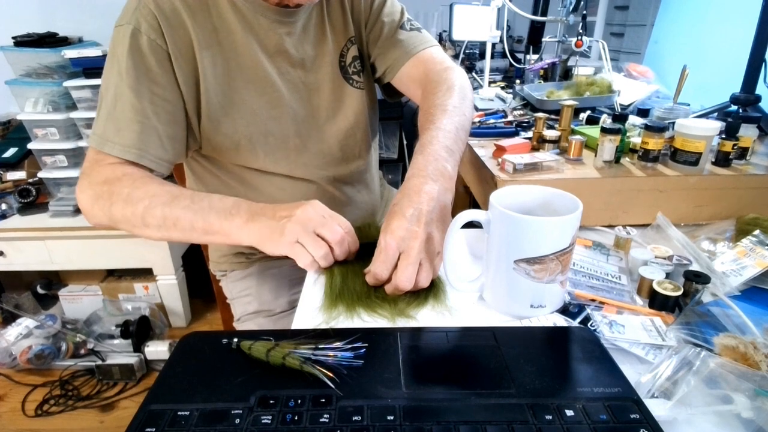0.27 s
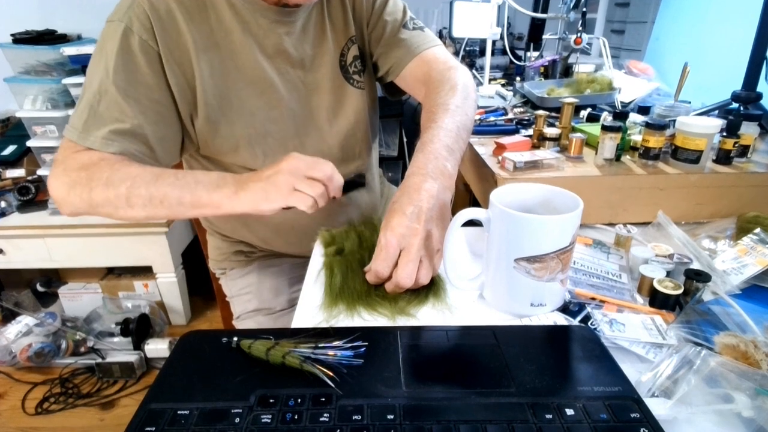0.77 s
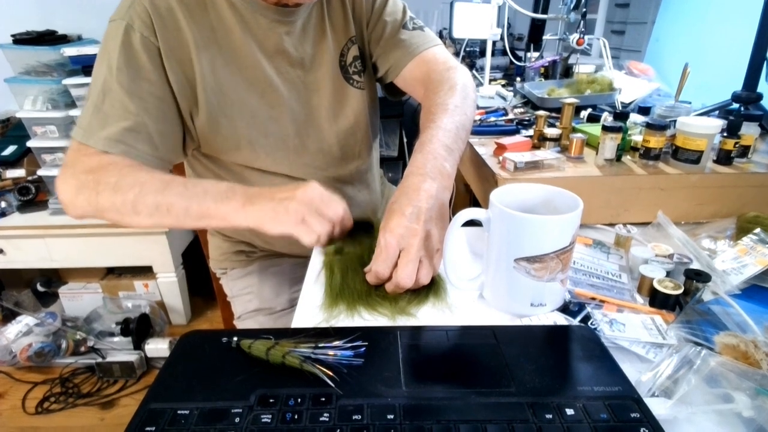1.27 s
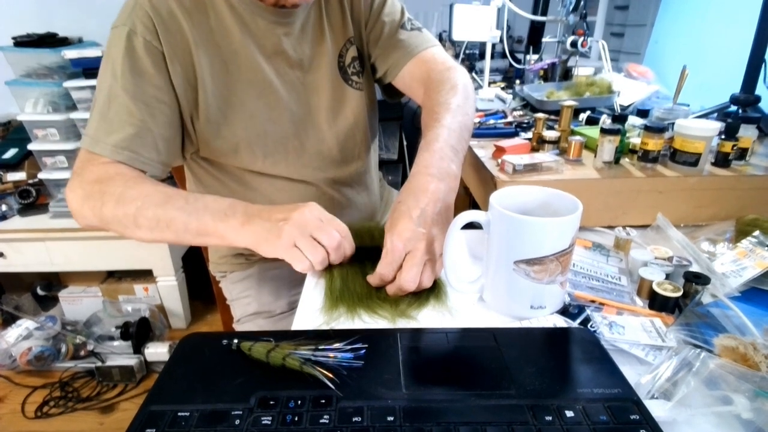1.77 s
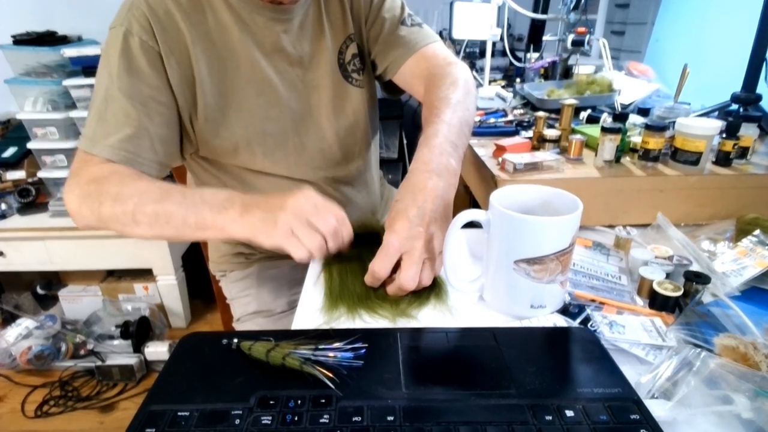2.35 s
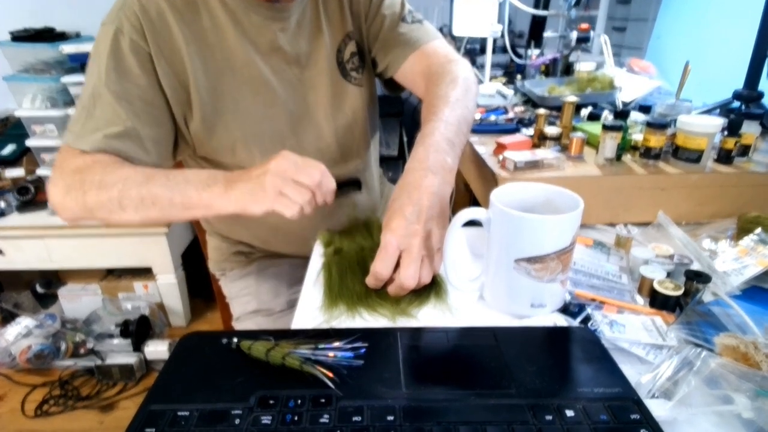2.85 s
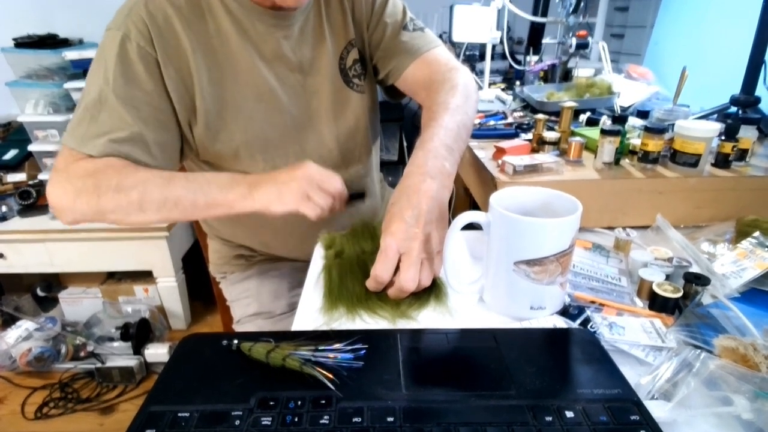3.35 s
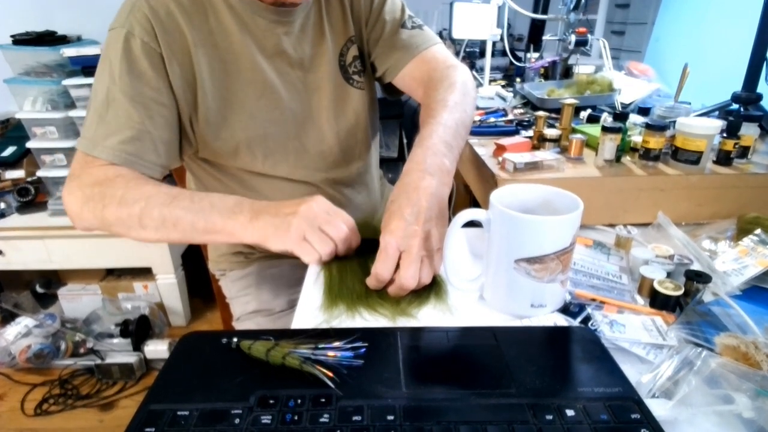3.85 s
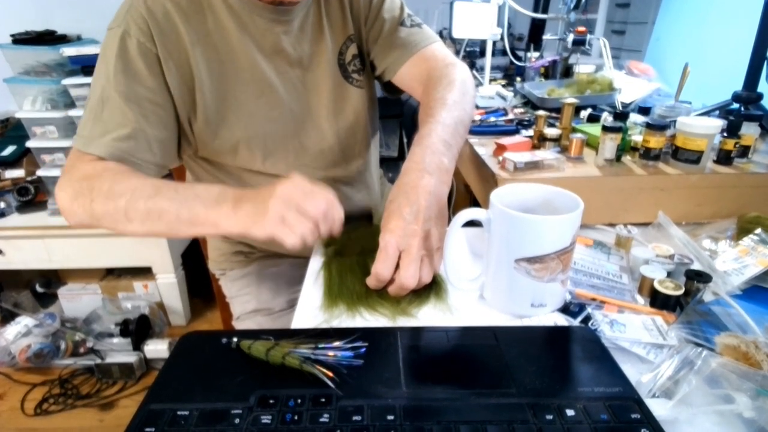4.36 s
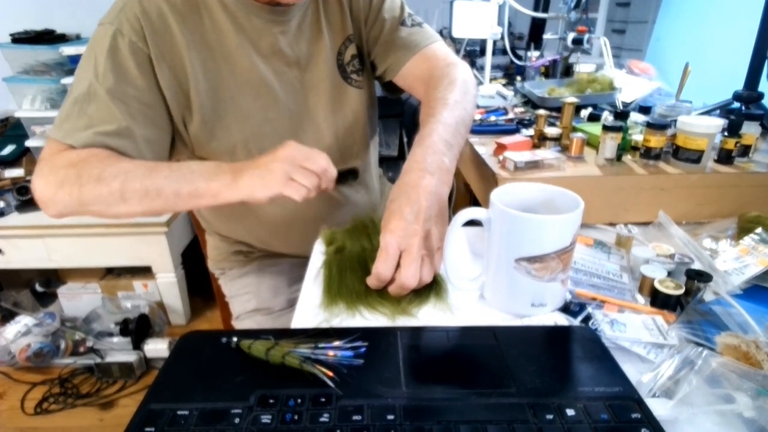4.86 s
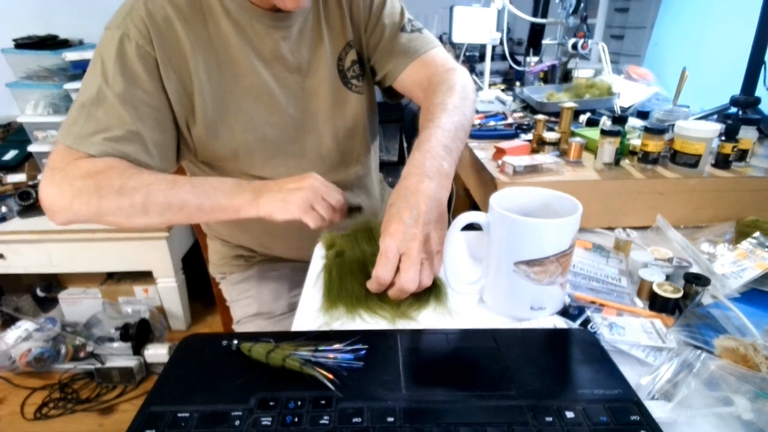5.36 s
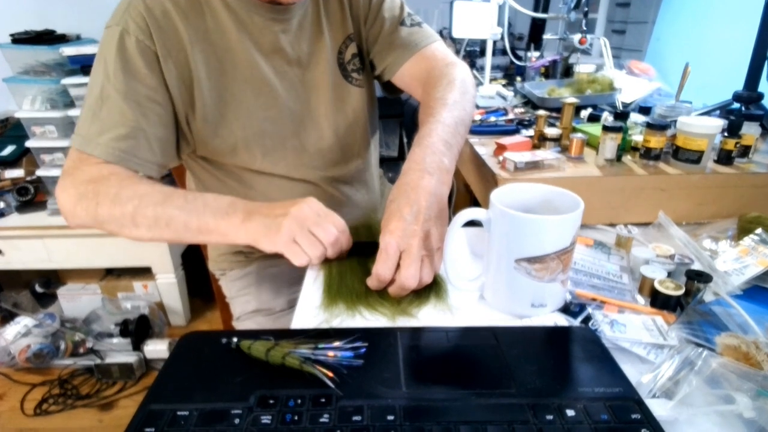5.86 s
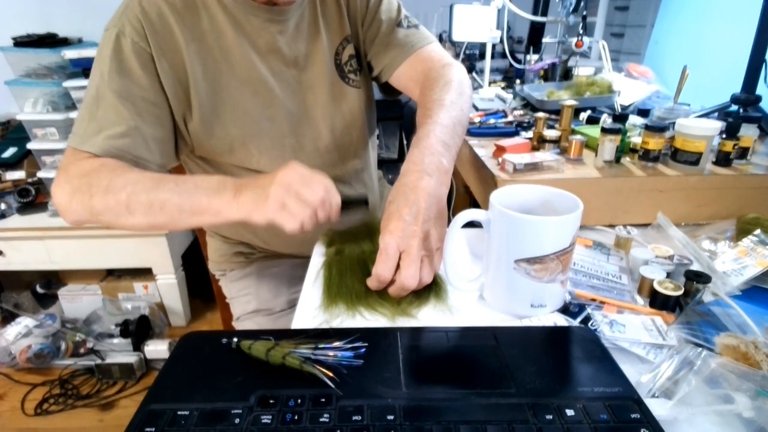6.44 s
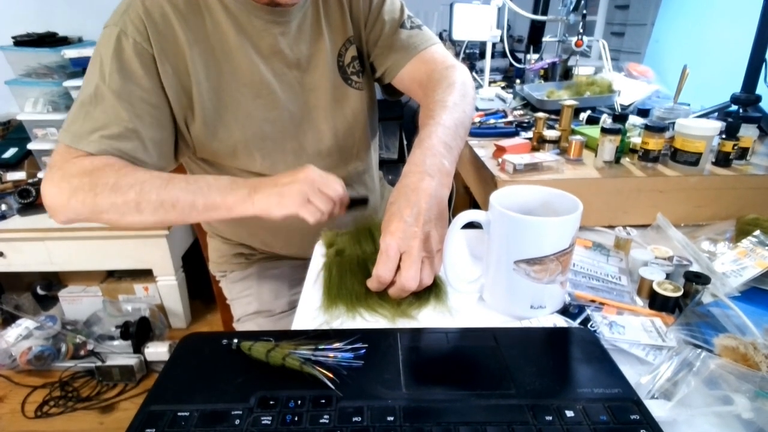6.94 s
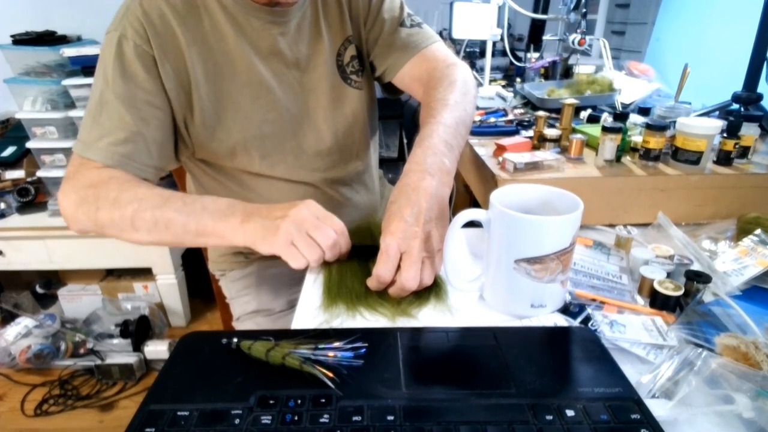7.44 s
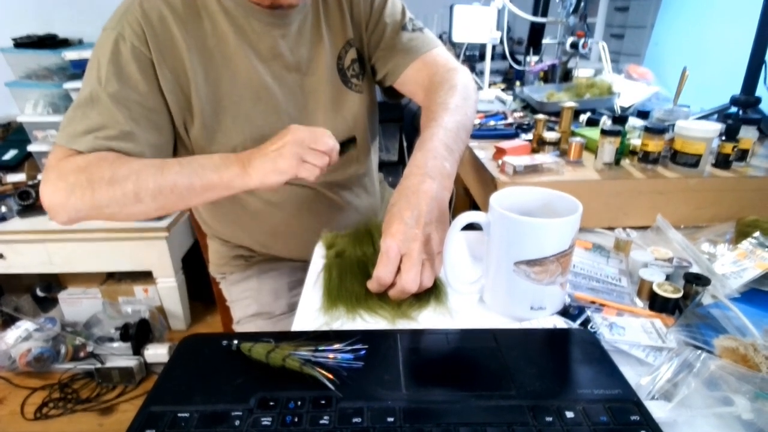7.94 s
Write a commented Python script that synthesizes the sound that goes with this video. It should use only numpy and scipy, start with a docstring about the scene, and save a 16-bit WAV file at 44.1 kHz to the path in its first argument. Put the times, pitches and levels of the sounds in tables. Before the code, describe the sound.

A small stiff brush is dragged through craft fur on a thin board in short, grainy strokes, roughly two every three seconds. Each swells, then lifts away with a brighter rasp, over a dull woody rub. Light taps and tiny clicks fall between, with one dry snap early on. Around the middle and later, three hard clattering raps hit the board. Close stereo microphone, small cluttered room, steady soft hiss.

```python
"""In a small cluttered room, a small stiff brush is dragged in short strokes through craft fur on a thin
board lying on a desk, close to a pair of microphone ports. Fibres slip off the teeth as fine random grains,
the board and desk drone under the pressure as filtered noise, and three times the teeth strike the board.
Lighter taps, ringing clicks and one dry snap lie between; room tails, hiss and a thin tone lie behind."""
import sys
import numpy as np
from scipy import signal
from scipy.fft import rfft, irfft
from scipy.io import wavfile
from scipy.ndimage import uniform_filter1d

SR = 44100
rng = np.random.default_rng(int(sys.argv[2]) if len(sys.argv) > 2 else 0)


def bounce(signal):
    """Save signal as a 16-bit WAV file at the path given by the first command-line argument."""
    frames = np.transpose(np.atleast_2d(signal))
    limited = np.clip(frames, -1, 1)
    pcm = np.round(limited * 32767).astype(np.int16)
    wavfile.write(sys.argv[1], SR, pcm)


N = 361708

# Microphone hiss and room air. Each row: frequency in Hz, density in dB per Hz before levelling.
HISS_COLOUR = [(12, -31.5), (20, -8.5), (107, -2.5), (137, -6), (260, -4.5), (407, -6), (508, -6.5),
               (653, -5), (840, -7), (1470, -8.5), (15700, -17)]
# Likeness of the hiss at the two ports. Each row: frequency in Hz, likeness from -1 to 1.
HISS_LIKENESS = [(60, 0.44), (180, 0.13), (550, 0.07), (1650, 0.088), (4970, -0.026), (15000, -0.071)]
HISS_LEFT_DB, HISS_RIGHT_DB = -60.5, -59.9
# Faint steady tone. Each row: frequency in Hz, level in dB rms.
WHINE_TONES = [(7391, -93)]
# Dying time of the room. Each row: frequency in Hz, time to fall by 60 dB in seconds.
ROOM_T60 = [(150, 0.68), (400, 0.16), (1040, 0.42), (2760, 0.36), (7280, 0.26)]
# Loudness of the room tail. Each row: frequency in Hz, level relative to the direct sound in dB.
ROOM_LEVEL = [(150, -14.5), (500, -9), (1500, -7), (3000, -0.5), (8000, 2.5)]
# Likeness of the room tail at the two ports. Each row: frequency in Hz, likeness from 0 to 1.
ROOM_LIKENESS = [(60, 1), (130, 0.46), (290, 0.92), (640, 0.94), (1410, 0.52), (3100, 0.25), (6820, 0.051),
                 (15000, 0.04)]
# Balance of the port pair. Each row: frequency in Hz, left minus right in dB.
PORT_TILT = [(60, -2.5), (240, -1.0), (950, -0.5), (3770, -1.5), (15000, 1.5)]
# Width of the brushing at the ports. Each row: frequency in Hz, side relative to mid in dB.
SWISH_WIDTH = [(60, -4), (130, -2), (290, -18.5), (640, -16.5), (1410, -11), (3100, -5), (6820, -2),
               (15000, 1)]
# Width of the hard strikes at the ports. Each row: frequency in Hz, side relative to mid in dB.
STRIKE_WIDTH = [(60, -4.5), (120, -19), (240, -14), (480, -22), (950, -11), (1890, -6), (3770, 0.5),
                (7520, -10), (15000, -1)]

# Resonances of board and brush. Each row: frequency in Hz, width in Hz, lift (or cut, if negative) in dB.
RESONANCES = [(279, 22, 5.5), (335.6, 36, 10.5), (475, 85, 3), (513, 69, 6), (732, 120, 13), (874, 61, 7),
              (1330, 26, 4), (1594, 120, 4), (1980, 140, 3), (2720, 72, 0), (2840, 27, -8),
              (3161, 40, -11.5), (3187, 175, 8), (3233, 127, -3), (3350, 180, -1), (5730, 230, -2.5)]
# Colours before the resonances and levelling. Each row: frequency in Hz, density in dB per Hz.
FIBRE_COLOUR = [(530, -33), (900, -8), (1290, -6), (1700, -4.5), (2250, -6.5), (2800, -1.5), (3350, -0.5),
                (3800, -25.5), (4600, -27), (7000, -52.5)]
RASP_COLOUR = [(2500, -52), (3500, 5), (4000, -0.5), (4800, -9), (5600, -16), (8300, -26.5), (15500, -20.5)]  # treble of fast fibres
TEETH_COLOUR = [(530, -35.5), (900, -4.5), (1350, -6.5), (1900, -3), (2350, -3.5), (2650, 4.5), (3400, 2),
                (3750, -9), (4400, -15), (5300, -23.5), (5900, -21), (6300, -31), (9000, -34.5),
                (15500, -54)]
STRUCK_BOARD_COLOUR = [(88, -44), (150, -13.5), (276, -6), (512, -2), (670, -12), (840, -21.5), (982, -27),
                       (1200, -20), (1560, -61), (2640, -120)]
PRESSED_BOARD_COLOUR = [(88, -34.5), (150, -3), (257, 0), (394, -0.5), (560, -5), (700, -13.5), (1000, -25),
                        (1200, -14), (1560, -47.5)]  # board under steady pressure
DESK_COLOUR = [(8, -26), (22, 1.5), (50, 6.5), (80, -5.5), (150, 1.5), (200, -10), (300, -36)]
SNAP_SPECTRUM = [(120, -28), (200, -30), (2090, -9), (2470, -15), (3070, 3.5), (4500, -9), (5300, -5),
                 (7090, -10), (7760, -9), (8820, -25), (12000, -16), (15500, -37)]

# Small pitched clicks among the clutter. Each row: start in seconds, level of the lower tone in dB, its pitch in Hz.
CLUTTER_CLICKS = [(0.477, -48, 1460), (0.495, -51, 1500), (.616, -57.5, 856), (.691, -58.5, 746),
                  (.984, -43, 657), (1.003, -44, 720), (1.191, -47.5, 1399), (1.207, -48.5, 3246),
                  (1.207, -43, 1480), (1.359, -53.5, 886), (2.694, -57.5, 870), (4.988, -50, 3110),
                  (6.347, -56.5, 215), (7.588, -55, 3240), (7.77, -52, 2930), (7.783, -52, 2960)]
CLICK_T60_S, CLICK_T60_SLOPE = 0.059, -0.43  # ring time at 1 kHz; higher clicks die sooner
# Dry, bright snap. Each row: start in seconds, peak of its drive in dB, length to 1/e in seconds.
SNAPS = [(1.3446, -29.5, 0.0026)]
# Light touches of the teeth on the board. Each row: start in seconds, nominal peak in dB, board relative to teeth in dB.
LIGHT_TAPS = [(0.113, -52, -17), (0.882, -51.5, -1.5), (0.9844, -55, 4), (1.0803, -33.5, -14),
              (1.333, -43, -28), (1.67, -50, -7), (1.771, -40, -11), (1.828, -40.5, -2), (2.387, -51, 8),
              (2.42, -45, -24), (2.768, -59, -11), (2.967, -48.5, -18), (3.395, -59.5, 0),
              (3.6424, -55.5, 3), (3.821, -41, -12), (4.11, -60.5, 3), (4.335, -47, 5), (4.985, -43.5, -3),
              (5.652, -49, 13.5), (5.741, -49, 1), (6.47, -53, -20), (6.647, -54, -10), (7.268, -50.5, -9),
              (8.186, -47, -15)]
TAP_RATTLE_S, TAP_DESK_DB = 0.014, -33  # desk relative to teeth
# Three hard strikes. Each row: start in seconds, nominal peak in dB, board relative to teeth in dB,
# rattle to 1/e in seconds, pitch factor of the struck spot, lift of the colour points above 5 kHz in dB.
HARD_STRIKES = [(4.5027, -19.5, -5.5, 0.031, 1.064, -0.5), (5.13, -20, -1, 0.033, 0.99, 2.5),
                (5.9037, -15, -5, 0.028, .99, 5.5)]
STRIKE_DESK_DB = -22  # relative to teeth
# Brush strokes. Each row: touch in seconds, then lengths of entry, pull and lift-off in seconds,
# fibres after entry in dB, fibres at the end of the pull in dB, desk relative to fibres in dB.
BRUSH_STROKES = [(0.098, 0.089, 0.038, 0.11, -57, -57, -11), (0.268, .065, 0.051, 0.13, -52, -52, -10),
                 (0.862, .1, 0.12, 0.083, -58.5, -46.5, -9), (1.558, 0.12, 0.12, 0.081, -58, -47.5, -10),
                 (2.268, 0.067, 0.099, 0.083, -53, -53, -11), (2.918, .04, .11, 0.075, -57.5, -51, -9),
                 (3.635, 0.027, 0.014, 0.056, -54, -53.5, -15),
                 (3.69, 0.039, 0.077, 0.043, -52.5, -43.5, -12),
                 (4.318, 0.045, 0.141, .035, -54.5, -46.5, -12),
                 (4.928, 0.05, 0.18, 0.041, -57, -48.5, -10),
                 (5.688, 0.062, 0.17, 0.047, -53.5, -47.5, -11), (6.535, 0.041, 0.11, 0.067, -53, -50, -11),
                 (7.308, 0.089, 0.072, 0.072, -51.5, -49, -13)]
TOUCH_DB = -18.5  # fibres at touch, relative to the end of the entry
LIFT_DB, LIFT_BEND = -33, 2.14  # fibres at the end, relative to the top; the fall starts slowly
RASP_DB, RASP_RISE_DB = -15, 11  # rasp relative to fibres at touch, and its rise over the stroke
# The hand leans on the brush. Each row: start in seconds, length to the middle of the fall in seconds, board in dB.
HAND_PRESSES = [(0.196, 0.035, -59.5), (0.283, 0.084, -55.5), (0.343, 0.07, -55), (0.961, 0.054, -48),
                (1.044, 0.086, -49.5), (1.655, 0.04, -61), (1.807, 0.045, -47), (2.37, 0.059, -51.5),
                (2.95, .04, -65), (3.079, 0.048, -56.5), (3.639, 0.043, -52), (3.774, 0.065, -44),
                (4.329, 0.087, -46.5), (4.416, 0.05, -56), (5.097, 0.067, -48), (5.744, 0.072, -47),
                (5.848, 0.11, -48), (6.61, 0.093, -51.5), (7.263, 0.028, -51), (7.374, 0.13, -49.5),
                (8.191, .03, -47.5)]
PRESS_RISE_S, PRESS_FALL_S = 0.009, 0.034
BOARD_DB, PRESS_DESK_DB = -8, -14.5  # board relative to fibres; desk relative to a press
EDGE_HZ = 15750


def amp(db):
    """Decibels to gain."""
    return 10 ** (np.asarray(db) / 20)


def evened(x):
    """Scales to rms 1."""
    return x / np.sqrt(np.mean(x ** 2) + 1e-20)


def read(points, hz):
    """Reads a table along log frequency."""
    f, value = np.transpose(points)
    return np.interp(np.log(hz + 1), np.log(f + 1), value)


def coloured(drive, spectrum, size=16384):
    """Passes a drive through the causal response with this spectrum and the resonances of board and brush."""
    hz = abs(np.fft.fftfreq(size, 1 / SR))
    db = read(spectrum, hz)
    for centre_hz, width_hz, lift_db in RESONANCES:
        db = db + lift_db / (1 + (2 * (hz - centre_hz) / width_hz) ** 2)
    log_gain = np.log(np.maximum(amp(db), 1e-5))
    phase = -signal.hilbert(log_gain).imag  # minimum phase: the response starts at once
    response = np.fft.ifft(np.exp(log_gain + 1j * phase)).real[:size // 2]
    return signal.oaconvolve(drive, response / np.linalg.norm(response))[:N]


def pair(frames, bins, same):
    """Random short-time spectra for two ports that are alike by the share same."""
    a, b, c, d = rng.standard_normal((frames, bins, 4)).T
    same = np.clip(same, -1, 1)[:, None]
    left, other = a + 1j * b, c + 1j * d
    return np.array([left, same * left + np.sqrt(1 - same ** 2) * other])


def grains(per_s, spread_db):
    """Clicks of random sign at random moments; a few are large."""
    present = rng.random(N) < per_s / SR
    size = np.minimum(rng.exponential(1, N), 5)
    return evened(present * random_signs() * amp(spread_db * size))


def random_signs():
    """White noise that only flips between -1 and 1."""
    return rng.choice([-1., 1.], N)


def lumps(size, depth_db):
    """A random gain of rms 1 that wanders over about size samples."""
    wander = uniform_filter1d(uniform_filter1d(rng.standard_normal(N), size), size)
    return evened(amp(depth_db * evened(wander)))


def hiss():
    """Microphone hiss and room air: shaped noise with faint patches drifting in time and frequency."""
    frames, hz = N // 256 + 5, np.fft.rfftfreq(1024, 1 / SR)
    patches = rng.standard_normal((frames, len(hz))).T
    patches = evened(uniform_filter1d(uniform_filter1d(patches, 14, 0), 12, 1))
    spectra = pair(frames, len(hz), read(HISS_LIKENESS, hz))
    spectra = spectra * amp(read(HISS_COLOUR, hz)[:, None] + 0.55 * patches)
    noise = signal.istft(spectra, nperseg=1024, noverlap=768)[1][:, :N]
    return amp([[HISS_LEFT_DB], [HISS_RIGHT_DB]]) * evened(noise)


def whine():
    """A thin steady sine behind the hiss, equal at both ports."""
    t = np.arange(N) / SR
    return sum(amp(db) * np.sqrt(2) * np.sin(2 * np.pi * hz * t) for hz, db in WHINE_TONES)


def room(x, count=4):
    """Noise tails dying band by band; several random tails fade into one another in a steady cycle."""
    hz, t, out = np.fft.rfftfreq(256, 1 / SR), np.arange(420) * 64 / SR, np.zeros((2, N))
    t60 = read(ROOM_T60, hz)[:, None]
    decay = amp(read(ROOM_LEVEL, hz)[:, None] - 60 * t / t60)
    decay /= np.sqrt(t60 * SR / np.log(1e6))  # the table alone sets the energy of the tail
    tilt = amp(read(PORT_TILT, hz)[:, None] * np.array([[[.5]], [[-.5]]]))
    for k in range(count):
        spectra = pair(len(t), len(hz), read(ROOM_LIKENESS, hz))
        gauge = np.std(signal.istft(spectra, nperseg=256, noverlap=192)[1])
        tail = signal.istft(spectra * decay * tilt, nperseg=256, noverlap=192)[1] / gauge
        tail *= np.minimum(np.arange(tail.shape[1]) / SR / 0.0034, 1)  # reflections need a moment to arrive
        share = np.sqrt(2 / count) * np.cos(np.pi * (4.3 * np.arange(N) / SR + k / count))
        out += signal.oaconvolve((x * share)[None], tail, axes=1)[:, :N]
    return out


def ports(ends, side):
    """The spaced ports share a mid; the side, set by frequency, is added at the left and taken off at the right."""
    hz = np.fft.rfftfreq(N, 1 / SR)
    mid, apart = rfft(ends)
    apart = apart * amp(read(side, hz))
    step = amp(read(PORT_TILT, hz) / 2)
    return irfft(np.array([(mid + apart) * step, (mid - apart) / step]), N)


def clicks():
    """Each click is a damped pair of close tones."""
    out, t = np.zeros(N + SR), np.arange(SR // 5) / SR
    for s, level_db, hz in CLUTTER_CLICKS:
        t60 = CLICK_T60_S * (hz / 1000) ** CLICK_T60_SLOPE
        tones = np.sin(2 * np.pi * hz * t) + 0.52 * np.sin(2 * np.pi * 1.09 * hz * t)
        out[round(s * SR):][:len(t)] += amp(level_db - 60 * t / t60) * tones
    return out[:N]


def snap():
    """A dry snap is a coloured noise burst of a few milliseconds."""
    burst, t = np.zeros(N + SR), np.arange(SR // 5) / SR
    for s, peak_db, length_s in SNAPS:
        burst[round(s * SR):][:len(t)] += amp(peak_db) * np.exp(-(t / length_s) ** 2)
    return np.array([coloured(burst[:N] * random_signs(), SNAP_SPECTRUM) for end in "ab"])


def taps(table, teeth_colour, board_colour, desk_db, rattle_s, crest_db, edge):
    """The teeth land one after another and bounce on the board for a moment; edge sets how abruptly that ends."""
    effort, t = np.zeros((3, N + SR)), np.arange(SR // 4) / SR
    bounces = lumps(size=45, depth_db=4.0)
    shape = np.exp(-(t / rattle_s) ** edge)
    for s, peak_db, board_db in table:
        at = round(s * SR)
        bumpy = shape * np.resize(bounces[at:], len(t))
        bumpy *= np.linalg.norm(shape) / np.linalg.norm(bumpy)  # bounces share out the energy of the blow
        levels = peak_db - crest_db + np.array([[0], [board_db], [desk_db]])
        effort[:, at:at + len(t)] += amp(levels) * bumpy
    teeth, board, desk = effort[:, :N]
    ends = [coloured(teeth * grains(per_s=7700.0, spread_db=2.5), teeth_colour)
            + coloured(board * random_signs(), board_colour) for end in "ab"]
    return np.array(ends), desk


def strikes():
    """Each hard blow lands on another spot, which shifts its colour and sets its treble; the desk sways on."""
    sound, desk = np.zeros((2, N)), np.zeros(N)
    for s, peak_db, board_db, rattle_s, factor, lift_db in HARD_STRIKES:
        colour = [(hz * factor, db + lift_db * (hz > 5000)) for hz, db in TEETH_COLOUR]
        ends, thump = taps([(s, peak_db, board_db)], colour, STRUCK_BOARD_COLOUR, STRIKE_DESK_DB,
                           rattle_s, crest_db=8.0, edge=3.2)
        sound, desk = sound + ends, desk + thump
    sway = signal.lfilter([1], [1, -np.exp(-1 / (0.028 * SR))], desk ** 2)  # energy dies over 28 ms
    return sound, np.sqrt(sway / (0.024 * SR))


def drag():
    """The hand's effort: fibres enter, swell through the pull and fall away; presses load board and desk."""
    t, (fibres, rasp, desk, press) = np.arange(N) / SR, np.zeros((4, N))
    for touch, entry_s, pull_s, lift_s, entry_db, top_db, desk_db in BRUSH_STROKES:
        u = np.arange(0, entry_s + pull_s + lift_s, 1 / SR)
        on = slice(round(touch * SR), round(touch * SR) + len(u))
        db = np.interp(u, [0, entry_s, entry_s + pull_s], [entry_db + TOUCH_DB, entry_db, top_db])
        db += LIFT_DB * np.clip((u - entry_s - pull_s) / lift_s, 0, 1) ** LIFT_BEND
        fibres[on] += amp(db)
        desk[on] += amp(db + desk_db)
        rasp[on] += amp(db + RASP_DB + RASP_RISE_DB * u / u[-1])  # faster fibres rasp brighter
    for s, length_s, board_db in HAND_PRESSES:
        rise = (t - s) / PRESS_RISE_S
        fall = (s + length_s + PRESS_FALL_S / 2 - t) / PRESS_FALL_S
        press += amp(board_db) * np.clip(np.minimum(rise, fall), 0, 1) ** 2
    board = np.hypot(amp(BOARD_DB) * fibres, press)
    return np.array([fibres, rasp, board, np.hypot(desk, amp(PRESS_DESK_DB) * press)])


def strokes():
    """Slipping fibres drive brush, board and desk; snags make the drag uneven. Two ends of the brush sound."""
    effort = drag()
    fibres, rasp = effort[:2] * lumps(size=500, depth_db=1.75)
    board, desk = effort[2:] * lumps(size=250, depth_db=1.5)
    ends = [coloured(fibres * grains(per_s=5000., spread_db=1.0), FIBRE_COLOUR)
            + coloured(rasp * grains(per_s=5800.0, spread_db=1.0), RASP_COLOUR)
            + coloured(board * grains(per_s=4000., spread_db=2.5), PRESSED_BOARD_COLOUR) for end in "ab"]
    return np.array(ends), desk


def scene():
    """Brush sounds in the room; the desk carries its low shake straight to the microphone."""
    (swish, rub), (strike, thump), ticks = strokes(), strikes(), clicks() + snap()
    touch, nudge = taps(LIGHT_TAPS, TEETH_COLOUR, PRESSED_BOARD_COLOUR, TAP_DESK_DB, TAP_RATTLE_S,
                        crest_db=9.0, edge=3.1)
    desk = rub + nudge + thump
    shake = [coloured(desk * rng.standard_normal(N), DESK_COLOUR) for end in "ab"]
    brushing = swish + touch + ticks + shake * amp([[0], [-3.]])
    direct = ports(brushing, SWISH_WIDTH) + ports(strike, STRIKE_WIDTH)
    into_room = swish[0] + touch[0] + strike[0] + amp(-12.0) * ticks[0]
    return direct + room(into_room) + hiss() + whine()


def record(dry):
    """The recorder's band limit: a steep low-pass filter."""
    low_pass = signal.firwin(511, EDGE_HZ, window=("kaiser", 9), fs=SR)
    return signal.oaconvolve(dry, low_pass[None], "same")


dry = scene()
out = record(dry)
bounce(out)
```